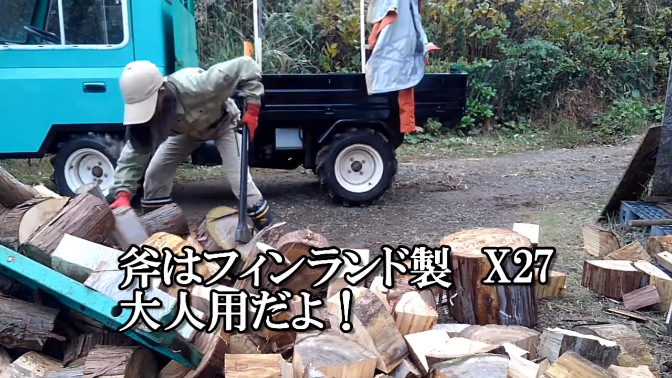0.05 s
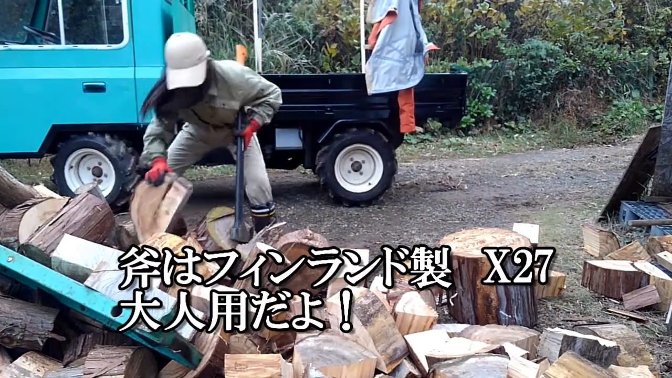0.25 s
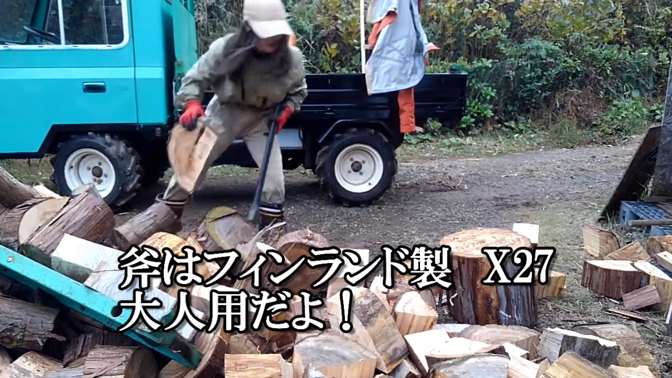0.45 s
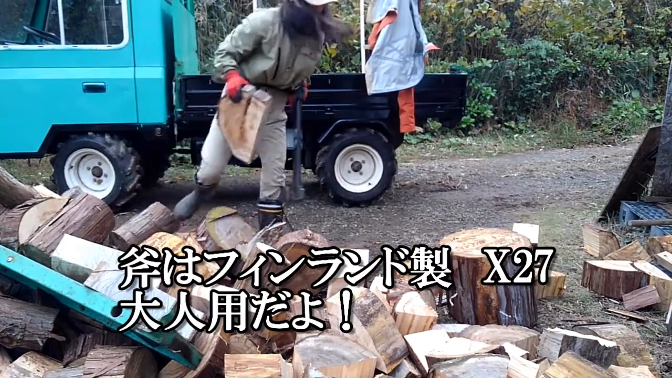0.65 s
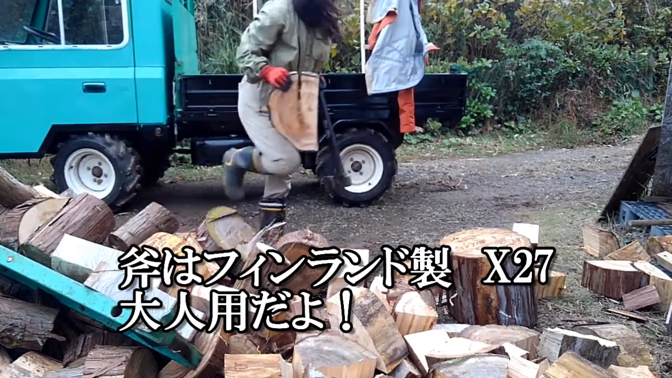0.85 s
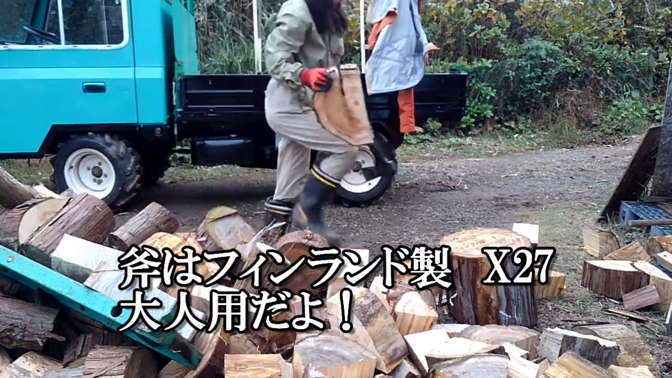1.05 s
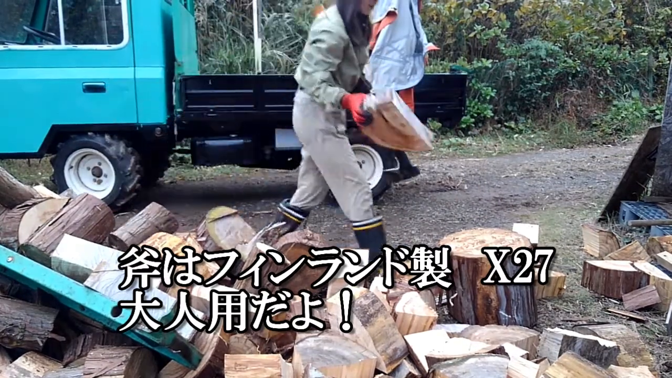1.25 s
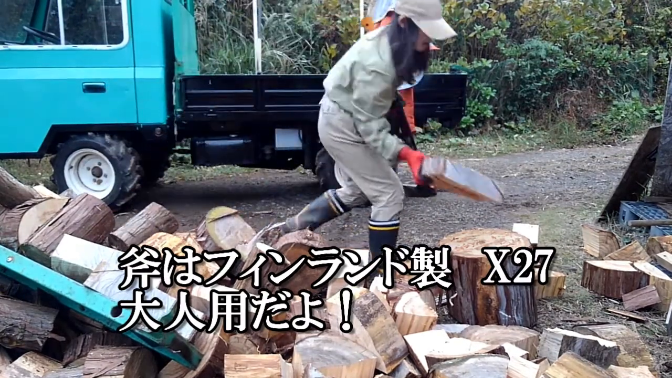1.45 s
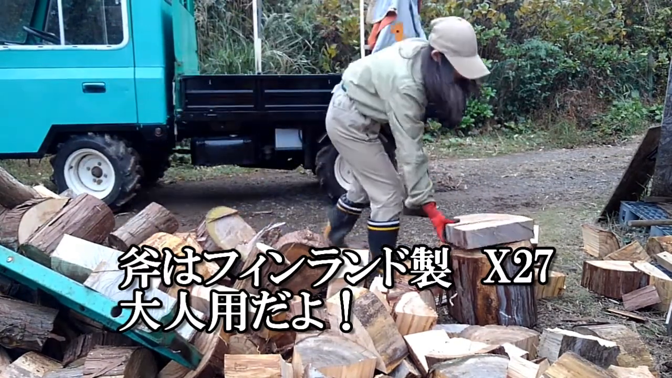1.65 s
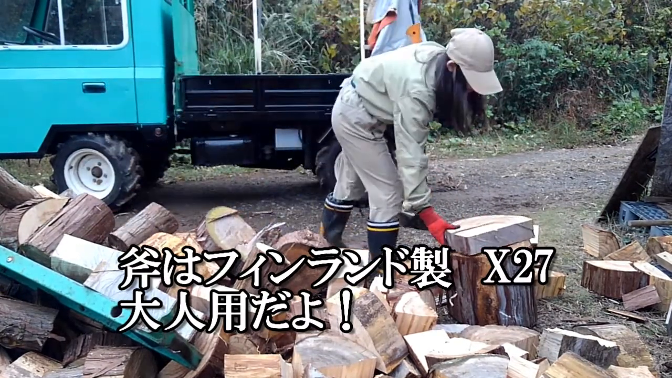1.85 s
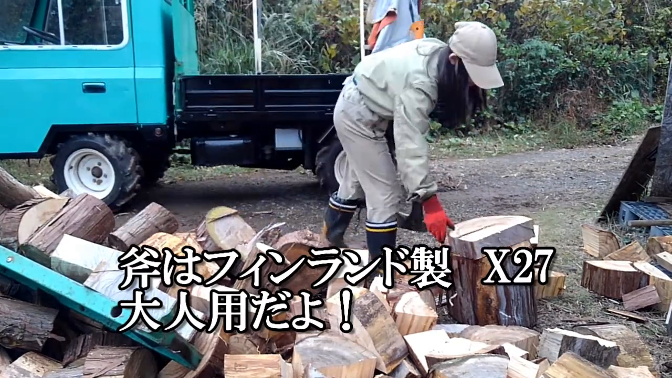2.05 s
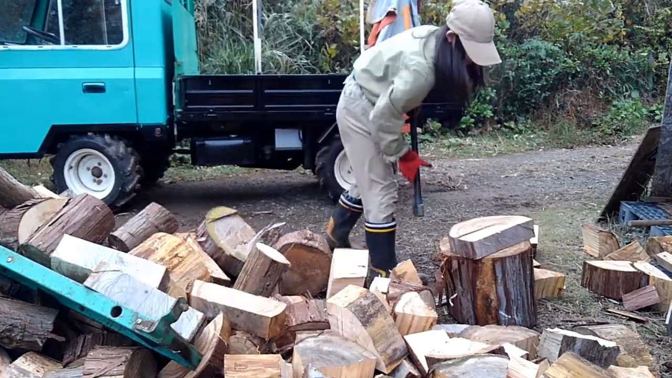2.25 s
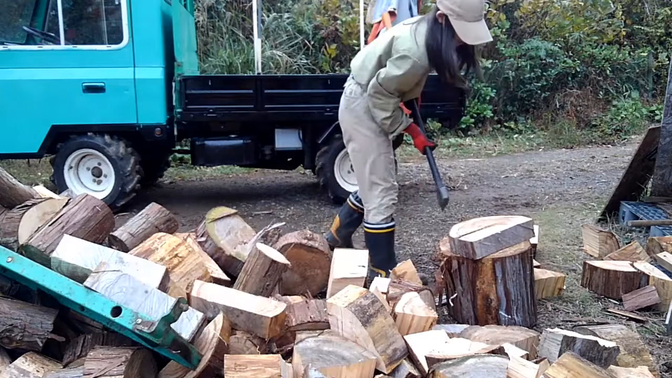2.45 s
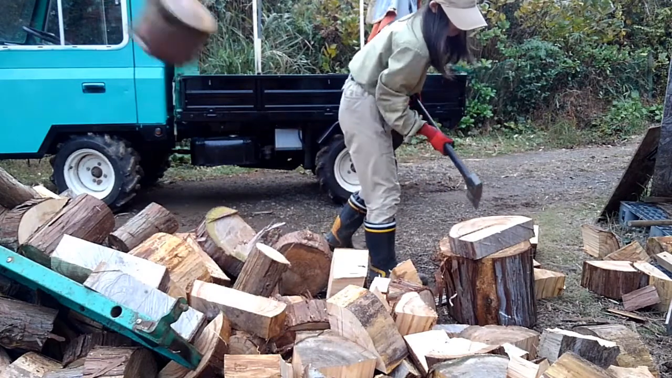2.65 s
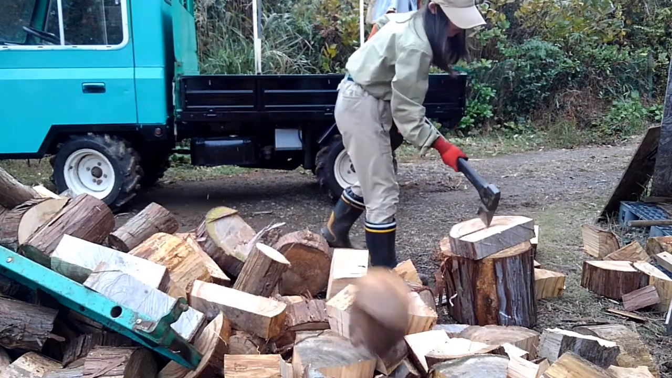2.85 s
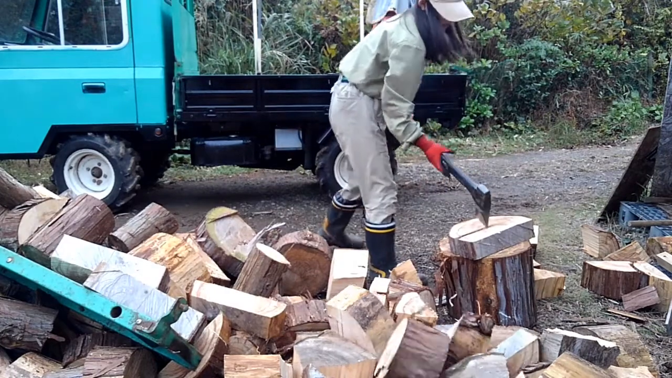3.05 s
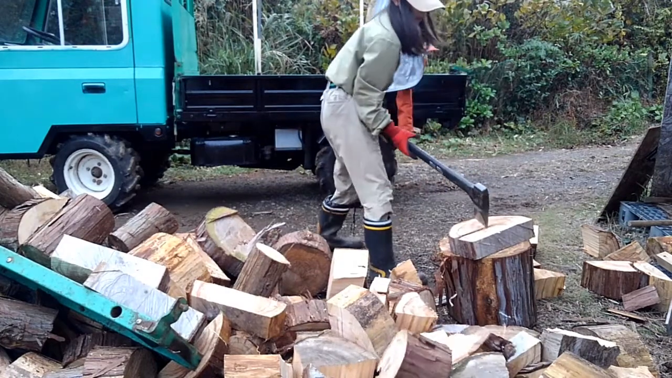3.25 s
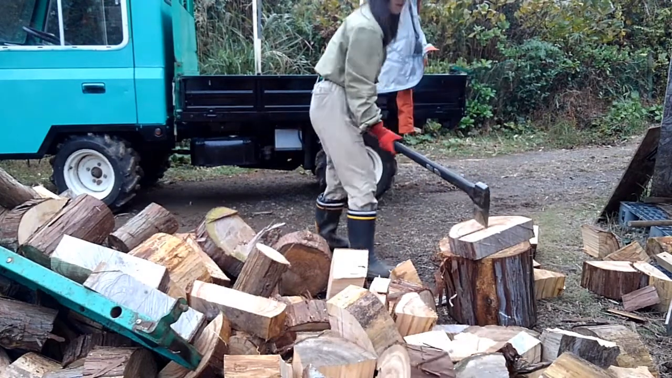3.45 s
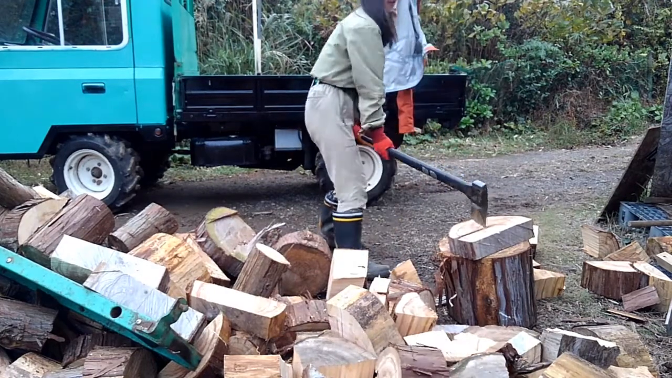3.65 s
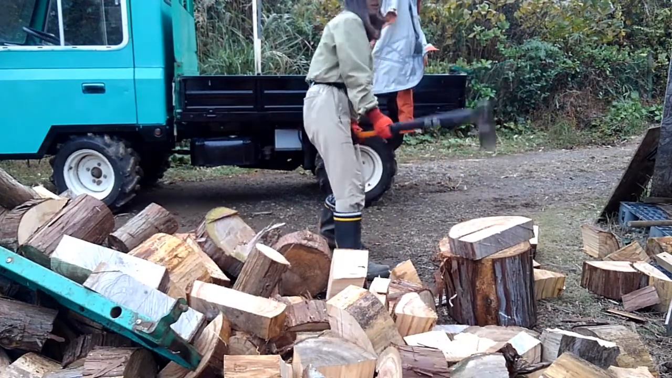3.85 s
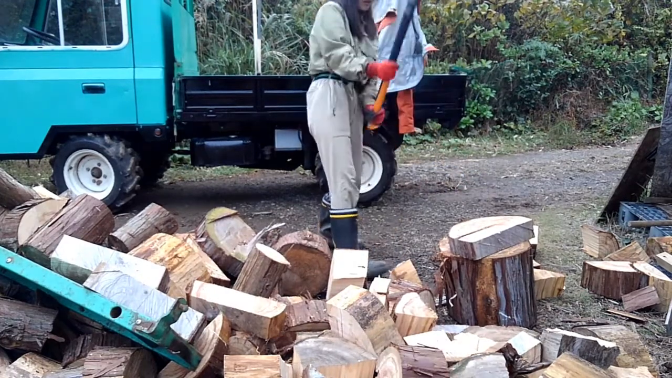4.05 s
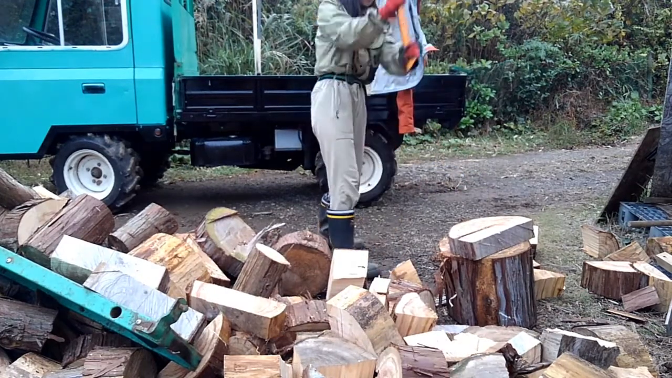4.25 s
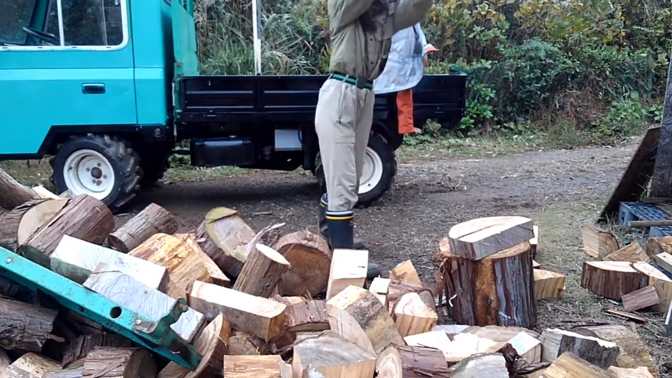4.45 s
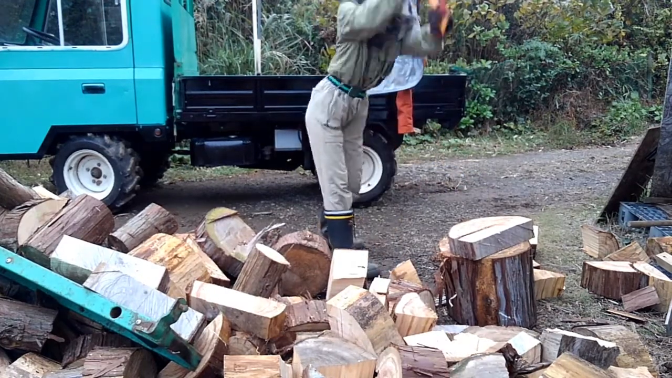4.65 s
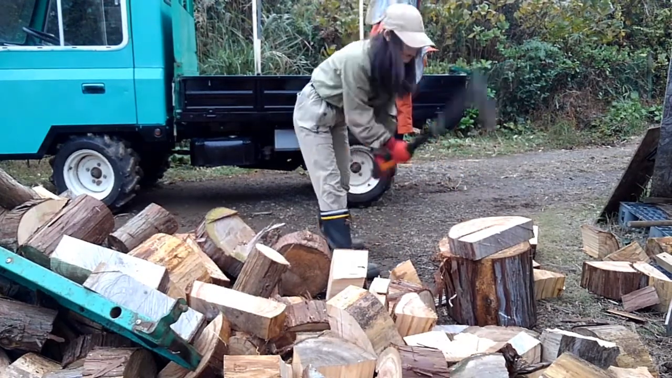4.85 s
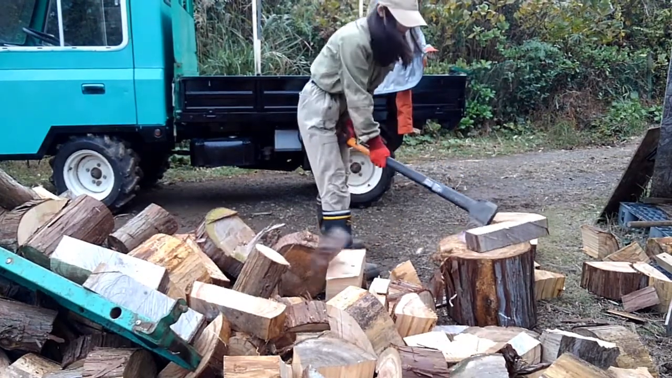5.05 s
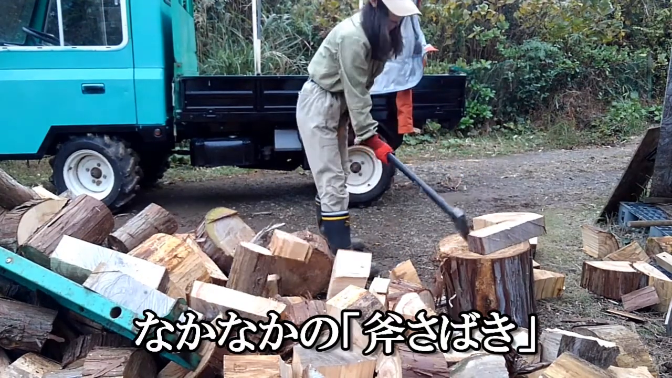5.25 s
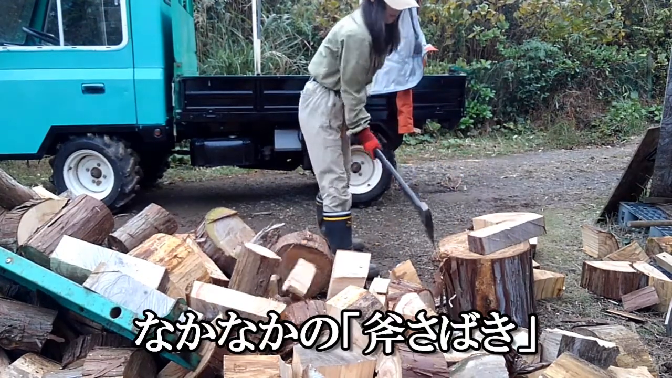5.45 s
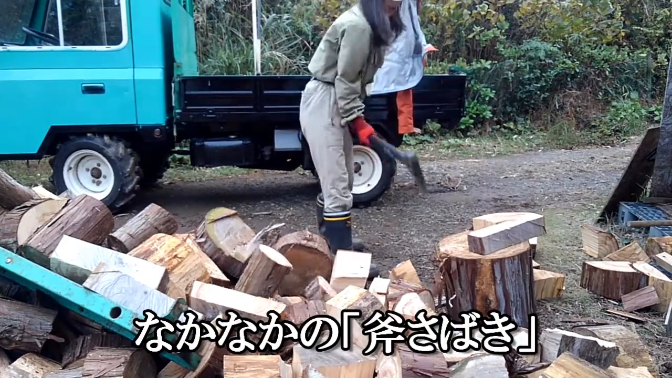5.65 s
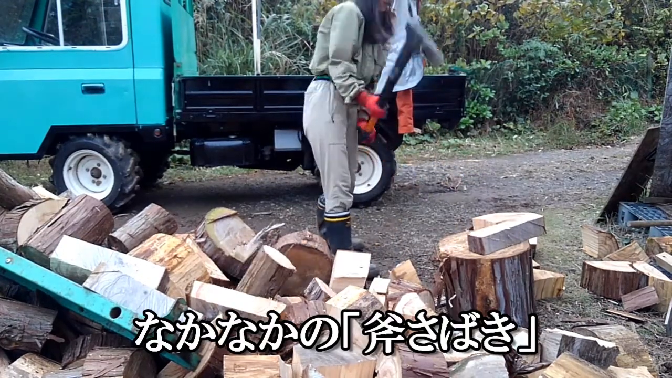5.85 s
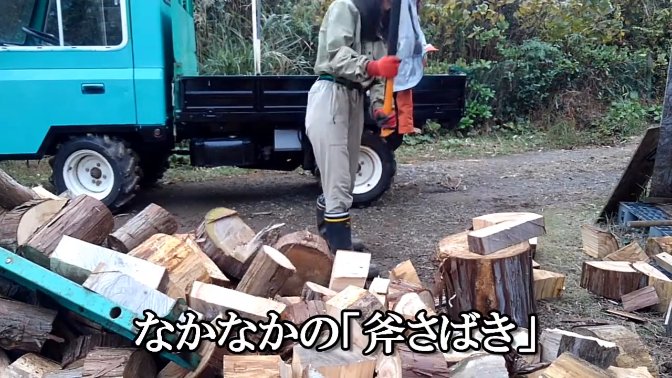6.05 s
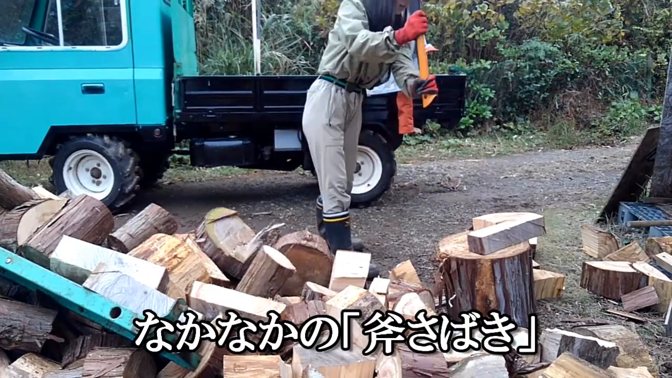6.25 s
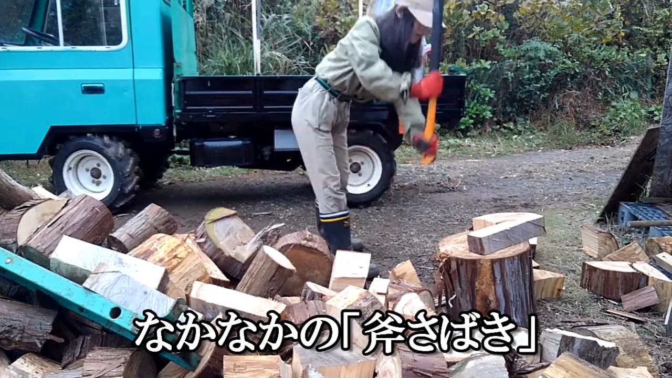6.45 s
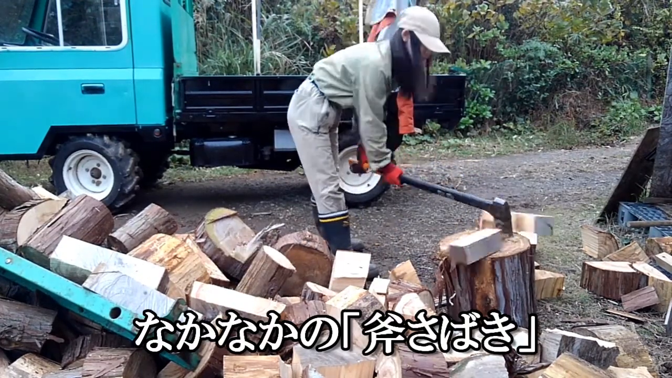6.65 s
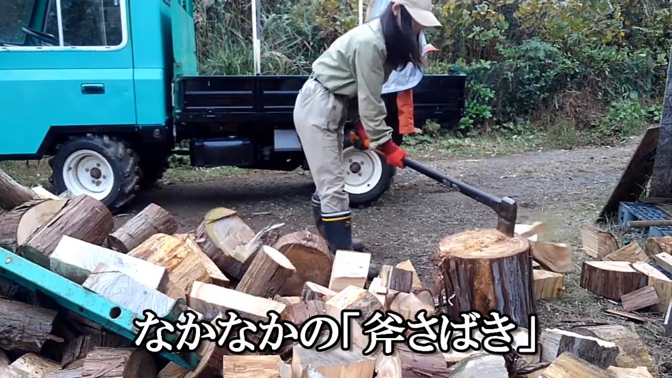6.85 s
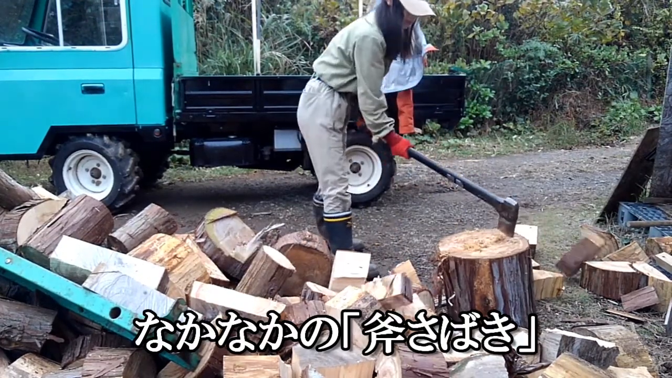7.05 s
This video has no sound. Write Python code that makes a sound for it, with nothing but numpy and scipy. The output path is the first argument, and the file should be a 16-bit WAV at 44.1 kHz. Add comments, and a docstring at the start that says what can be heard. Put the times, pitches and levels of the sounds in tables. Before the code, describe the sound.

In a quiet open yard, rubber boots crunch on gritty earth and wood pieces knock faintly. A tossed round booms onto the pile and chips trickle. After a lull, an axe cracks hard into a thick billet, and pieces tumble. A second, brighter, splintering blow follows with a low thud from the block. The microphone is a few metres away; a tiny engine revs far off.

```python
"""Two axe blows split firewood in an open yard: dying showers of fibre snaps heard through ringing wood.
Before them, boots press gritty earth, billets knock, and a tossed round lands on the pile with a boom.
Pieces tumble as decaying modes, chips rain as short tones, and boots and cloth scrape as shaped noise.
Pile, parked truck and trees answer as noise tails; behind lie air, low rumble and rustle.
A small engine revs very far away, as a few wavering harmonics."""
import sys
import numpy as np
from scipy import signal
from scipy.fft import rfft, irfft, next_fast_len
from scipy.io import wavfile
from scipy.ndimage import map_coordinates

SR = 44100
rng = np.random.default_rng(int(sys.argv[2]) if len(sys.argv) > 2 else 0)


def wav_out(sig):
    """Save sig, one row per channel (or a flat mono array), as 16-bit PCM at SR to the path in sys.argv[1]."""
    wavfile.write(sys.argv[1], SR, np.round(np.clip(np.atleast_2d(sig).T, -1, 1) * 32767).astype(np.int16))


N = 313110

# heavy blows driving the block and the ground:
# (time [s], thud drive [dB], knock drive [dB], knock pitch [Hz])
HEAVY_BLOWS = [(2.8876, -44, -8, 540), (2.9244, -32.5, -16, 332), (4.9183, -25.5, -7.5, 606),
               (6.6668, -20, -19, 904)]
# colour of grit under boots and in scrapes: (frequency [Hz], density [dB per Hz])
GRIT_COLOUR = [(80, -0.5), (500, 1.5), (5000, -8), (9000, -15), (13000, -9.5), (16000, -11.5)]


def amp(db):
    """Decibels to gain."""
    return 10 ** (np.asarray(db) / 20)


def unit(x):
    """Scale to rms 1."""
    return x / np.sqrt(np.mean(x ** 2) + 1e-20)


def along(points, hz):
    """Read (Hz, value) points at any frequency, on a log axis."""
    f, v = np.transpose(points)
    return np.interp(np.log(hz + 1), np.log(f + 1), v)


def wobble(rate):
    """A smooth random curve with the given number of knots a second."""
    knots = rng.standard_normal(int(N * rate / SR) + 4)
    return map_coordinates(knots, [np.arange(N) * rate / SR])


def swell(s, rise, fall):
    """A bell-shaped rise to 1 at time s and a fall back to 0; rise and fall are Gaussian widths [s]."""
    t = np.arange(N) / SR - s
    return np.exp(-.5 * (t / np.where(t < 0, rise, fall)) ** 2)


def filtered(x, response):
    """Multiply the spectrum of x by a response of frequency."""
    m = next_fast_len(len(x) + SR // 4)
    return irfft(rfft(x, m) * response(np.fft.rfftfreq(m, 1 / SR)), m)[:len(x)]


def noise(colour_db, size=N):
    """Coloured noise of rms 1."""
    return unit(filtered(rng.standard_normal(size), lambda hz: amp(colour_db(hz))))


def add(track, s, sound):
    """Mix a sound into the track at time s."""
    part = track[max(round(s * SR), 0):][:len(sound)]
    part += sound[:len(part)]


def body(spectrum, tilt_db=0, size=2048):
    """Minimum-phase impulse response of energy 1; the tilt is in dB per octave about 1 kHz."""
    hz = np.fft.rfftfreq(size, 1 / SR)
    octaves = np.log2(np.maximum(hz, 100) / 1000)
    level_db = np.maximum(along(spectrum, hz), -70) + tilt_db * octaves
    cepstrum = irfft(np.log(amp(level_db)))
    # folding the cepstrum onto positive time makes the response causal
    cepstrum[1:size // 2] *= 2
    cepstrum[size // 2 + 1:] = 0
    response = irfft(np.exp(rfft(cepstrum)))
    return response / np.linalg.norm(response)


def fade(t60):
    """Half a second of exponential decay, 60 dB in t60 seconds."""
    return np.exp(-np.log(1000) * np.arange(SR // 2) / SR / max(t60, .003))


def ring(modes, scatter_db=-0.1, attack=.0005):
    """Sum damped modes, struck at new strengths and phases each time."""
    t = np.arange(SR // 2) / SR
    total = np.zeros(len(t))
    for hz, db, t60 in modes:
        strength = amp(db + scatter_db * rng.normal())
        total += strength * fade(t60) * np.sin(2 * np.pi * (hz * t + rng.random()))
    return (1 - np.exp(-t / attack)) * total


def crack(response, t60, spiky_db, push_db=-6):
    """One blunt push and a dying shower of fibre snaps, heard through the wood."""
    # each random strength holds for 16 samples
    strengths = np.repeat(rng.standard_normal(SR // 2), 16)[:SR // 2]
    snaps = rng.standard_normal(SR // 2) * amp(spiky_db * strengths)
    force = snaps * fade(t60)
    force /= np.linalg.norm(force)
    push = np.hanning(32)
    add(force, 0, amp(push_db) * push / push.sum())
    sound = signal.fftconvolve(force, response)[:SR // 2]
    # same energy as the bare decay envelope
    return sound * np.linalg.norm(fade(t60)) / np.linalg.norm(sound)


def split(stages, colour, modes, ringing, spiky_db, push_db):
    """The edge bites, the grain tears in a few jerks, and the freed wood rings."""
    out, response = np.zeros(N), body(colour)
    for s, db, t60 in stages:
        add(out, s, amp(db) * crack(response, t60, spiky_db, push_db))
    ring_s, ring_db = ringing
    add(out, ring_s, amp(ring_db) * ring(modes))
    return out


def axe():
    """Two splitting blows excite each billet's modes; the freed steel head rings faintly after each."""
    # bite of the edge, then tearing: (time [s], level [dB], decay t60 [s])
    first_split = [(4.9198, -3.5, 0.042), (4.9275, -12.5, 0.088), (4.9325, -7, .06), (4.9385, -14, 0.079)]
    second_split = [(6.6662, -33, .02), (6.6688, -7.5, 0.068), (6.674, -8.5, 0.074), (6.6825, -8, 0.069),
                    (6.6895, -13.5, 0.084)]
    # colour of the crashes: (frequency [Hz], density [dB per Hz])
    thick_colour = [(60, -12.5), (130, -12.5), (240, -2.5), (430, -6), (720, 1), (1000, -1), (1550, -11),
                    (1900, -8), (3000, -13), (4700, -17), (6500, -25), (9000, -37), (13000, -22.5),
                    (16000, -41)]
    thin_colour = [(60, -13.5), (170, -2), (300, -1.5), (390, -11), (520, -1), (1000, 0), (2200, -3),
                   (2900, -3), (4800, -6.5), (6500, -12), (8800, -21), (12500, -12.5), (16000, -24.5)]
    # ringing of the wood and of the axe head: (frequency [Hz], level [dB], decay t60 [s])
    thick_modes = [(228, -4, .11), (324, -1, 0.11), (559, -9.5, .1), (644, -4.5, 0.09), (740, -6, 0.086),
                   (854, -2, 0.14), (1007, 1.5, 0.12), (1190, -8.5, 0.087), (1373, -7.5, 0.2),
                   (1660, -8, .09), (2170, -12, 0.076), (2530, -5, 0.17), (3070, -13, 0.21),
                   (3620, -15, .11), (4400, -10, .09), (5580, -13.5, .1)]
    thin_modes = [(888, -2, .09), (1035, 7, 0.082), (1192, -1.5, 0.076), (1577, -4, 0.12),
                  (1795, 2.5, 0.082), (2135, -2.5, 0.099), (2340, -10, 0.15), (2610, 6, 0.064),
                  (3050, -8, 0.1), (3250, -16, 0.09), (3600, -15, 0.096), (4090, -10, .08), (4240, -9, .09),
                  (4720, -2, 0.087), (5490, -13, .11)]
    steel_modes = [(1210, -1.5, .4), (2700, -2, .45), (2920, 0, .45), (3280, -8.5, 0.37), (4620, -5.5, .3),
                   (4818, 1.5, .33), (4800, -1, .3)]
    # the head comes free: (time [s], level [dB])
    head_free = [(4.922, -44), (6.673, -40.5)]
    # ringing: (time [s], level [dB])
    out = split(first_split, thick_colour, thick_modes, ringing=(4.9215, -18.5), spiky_db=5.0, push_db=-1.5)
    out += split(second_split, thin_colour, thin_modes, ringing=(6.6815, -18.5), spiky_db=3.5, push_db=-6.0)
    for s, db in head_free:
        add(out, s, amp(db) * ring(steel_modes))
    return out


def thuds():
    """Heavy blows drive the block and ground: a short hollow knock and a low boom."""
    # the chopping block on the ground: (frequency [Hz], level [dB], decay t60 [s])
    block_modes = [(85.6, 1, 0.27), (107, -9.5, .25), (57.84, -15, .3)]
    out = np.zeros(N)
    for s, thud_db, knock_db, hz in HEAVY_BLOWS:
        add(out, s, amp(knock_db) * ring([(hz, 3, .035)], scatter_db=.5, attack=0.0018))
        add(out, s, amp(thud_db) * ring(block_modes, scatter_db=2.0, attack=.004))
    return out


def tossed_round():
    """A heavy round lands on one edge, slams into the pile and rings in its own modes."""
    # contacts with the pile: (time [s], level [dB], decay t60 [s], tilt [dB per octave])
    landing_hits = [(2.8871, -18.5, 0.057, 2), (2.902, -28.5, 0.051, 7.5), (2.9246, -10, 0.041, -1.5),
                    (2.9274, -8.5, 0.042, 0.5), (2.9396, -16, 0.085, 0.5)]
    # colour of the crash: (frequency [Hz], density [dB per Hz])
    round_colour = [(60, -19.5), (160, -9), (290, -1), (420, -5), (600, -3), (900, 0.5), (1500, -9.5),
                    (1950, -7.5), (2600, -18.5), (4200, -23), (6500, -32.5), (9000, -43), (13000, -38.5),
                    (16000, -53)]
    # ringing of the round: (frequency [Hz], level [dB], decay t60 [s])
    round_modes = [(276, -6, 0.11), (333, -9, .1), (558, 4, 0.08), (910, 10.5, 0.039), (1380, -14, 0.13),
                   (1696, -4, 0.12), (2100, -12.5, .12), (2285, -12, 0.099), (3170, -18, .08)]
    out = np.zeros(N)
    for s, db, t60, tilt_db in landing_hits:
        add(out, s, amp(db) * crack(body(round_colour, tilt_db), t60, spiky_db=4.5, push_db=1.5))
    ring_s, ring_db = 2.9262, -19.5
    add(out, ring_s, amp(ring_db) * ring(round_modes))
    return out


def billets():
    """Each loose piece clacks, rings briefly in its bending modes and slaps down with its other end."""
    # pieces knock and settle: (time [s], level [dB], ring pitch [Hz], tilt [dB per octave])
    piece_knocks = [(.276, -51.5, 1890, 0), (.378, -45.5, 1545, -2.5), (.477, -53, 1090, 0),
                    (.564, -50, 2340, 3.5), (.645, -52.5, 1220, 1.5), (.722, -48.5, 1085, 4),
                    (.751, -50, 1070, 2), (.8, -49, 1056, 0.5), (1.6, -41, 940, -2.5),
                    (1.673, -40.5, 767, -0.5), (2.225, -51, 420, -1.5), (2.311, -46, 402, -2.5),
                    (2.998, -29.5, 341, -5), (3.002, -35, 1247, -5), (3.1173, -42, 1525, -1),
                    (3.423, -43, 670, -6), (4.778, -46, 1490, 1.5), (5.009, -36, 553, 1.5),
                    (5.0413, -27.5, 1690, 0), (5.163, -28, 510, -3), (5.435, -35.5, 475, 2),
                    (5.611, -43.5, 633, -1.5), (6.205, -53.5, 640, -4), (6.807, -32.5, 452, -2),
                    (6.9708, -37, 658, -3.5), (7.0243, -48.5, 710, -3.5), (7.088, -47.5, 442, -4.5)]
    # colour of a clack: (frequency [Hz], density [dB per Hz])
    bark_colour = [(60, -17.5), (200, -2), (500, 3.5), (1500, -3), (4500, -9.5), (9000, -26),
                   (13000, -24.5), (16000, -30)]
    clack_t60_1k, low_rings_longer = .058, .2  # decay [s] for a 1 kHz piece; power of 1 / pitch
    ring_over_clack_db = 2
    slap_delay, slap_db, slap_tilt_db = .016, -7.5, 1  # [s], [dB], extra brightness [dB per octave]
    out = np.zeros(N)
    for s, db, hz, tilt_db in piece_knocks:
        t60 = clack_t60_1k * (1000 / hz) ** low_rings_longer
        tone = ring([(hz, 0, t60 * .7), (hz * 1.31, -7, t60 * 0.5), (hz * 2.13, -8, t60 * .45)])
        clack = crack(body(bark_colour, tilt_db), t60, spiky_db=6.5)
        slap = crack(body(bark_colour, tilt_db + slap_tilt_db), t60, spiky_db=2.5)
        add(out, s, amp(db) * (clack + amp(ring_over_clack_db) * tone))
        add(out, s + slap_delay, amp(db + slap_db) * slap)
    return out


def splinters():
    """Splinters snap against the pile: thin dry ticks with hardly any ring."""
    # snaps: (time [s], level [dB])
    splinter_ticks = [(1.402, -38.5), (2.428, -51), (5.099, -49), (5.2851, -36), (5.29, -43.5),
                      (5.451, -39), (6.755, -33), (6.901, -42)]
    # colour of a tick: (frequency [Hz], density [dB per Hz])
    splinter_colour = [(300, -21.5), (1500, -4.5), (3200, -1.5), (4400, 1), (6000, -9), (8000, -27),
                       (13000, -28), (16000, -32)]
    out, response = np.zeros(N), body(splinter_colour)
    for s, db in splinter_ticks:
        add(out, s, amp(db) * crack(response, t60=0.031, spiky_db=2.5))
    return out


def debris(per_second=260, size_db=4, tilt_db=-3.0):
    """Chips and bark rain down or shift under a boot: many tiny, a few large, each with its own pitch."""
    # showers: (start time [s], reference level [dB], decay t60 [s])
    chip_showers = [(.45, -56.5, 1.25), (1.61, -36.5, 0.45), (2.945, -36, 0.26), (4.95, -33, .34),
                    (6.7, -27.5, 0.37)]
    out, t = np.zeros(N), np.arange(400) / SR
    for s, db, t60 in chip_showers:
        delay = rng.uniform(0, t60, max(int(per_second * t60), 1))
        hz = np.clip(2300 * np.exp(.6 * rng.standard_normal(len(delay))), 850, 7000)
        chip_size = np.minimum(rng.exponential(size=len(delay)), 2.5)
        gains = amp(size_db * chip_size - size_db + tilt_db * np.log2(2300 / hz) / 2)
        for late, f, gain in zip(delay, hz, gains):
            chip = np.sin(2 * np.pi * f * t) * np.exp(-f * t / 3.1)  # rings for a few cycles
            dying = np.exp(-np.log(1000) * late / t60)
            add(out, s + late, amp(db) * gain * dying * chip)
    return out


def steps():
    """Rubber boots press on packed earth and crunch its grit."""
    # soft footfalls: (time [s], level [dB])
    footfalls = [(.28, -61), (.5, -52.5), (.56, -57), (1.0, -62), (1.295, -44.5), (1.598, -45),
                 (1.98, -53.5), (3.478, -50.5), (3.52, -42.5)]
    grit_db, grit_t60 = -5.5, 0.24  # level against the step [dB], decay [s]
    earth = body([(40, -15), (100, 1.5), (170, -1.0), (400, -12.0), (1200, -38), (8000, -55)])
    grit = body(GRIT_COLOUR, tilt_db=-1.0)
    out = np.zeros(N)
    for s, db in footfalls:
        add(out, s, amp(db) * crack(earth, t60=0.16, spiky_db=3.5))
        add(out, s, amp(db + grit_db) * crack(grit, grit_t60, spiky_db=6.5, push_db=-11))
    return out


def scuffs(grain_db=3.0, focus_db=3.0):
    """Boots, chips and cloth scrape: short swells of grainy noise."""
    # scrapes: (peak time [s], level [dB], Gaussian width [s], focus frequency [Hz])
    scrapes = [(1.312, -56, 0.051, 3460), (1.401, -49.5, 0.017, 4230), (1.649, -51, 0.029, 3520),
               (1.888, -53.5, 0.034, 3500), (2.124, -53.5, 0.05, 3100), (3.541, -58.5, .025, 1490),
               (4.754, -53, 0.036, 2250), (5.24, -54.5, 0.029, 5000), (5.632, -56, .028, 4450),
               (6.916, -45.5, 0.0067, 6500)]
    out, t = np.zeros(N), np.arange(SR // 2) / SR
    middle = t.mean()
    for s, db, width, focus_hz in scrapes:
        focus = lambda hz: focus_db * np.log2((hz + 1) / focus_hz) ** 2
        hiss = noise(lambda hz: along(GRIT_COLOUR, hz) - focus(hz), size=len(t))
        grains = unit(amp(grain_db * wobble(700)[:len(t)]))
        envelope = np.exp(-.5 * ((t - middle) / width) ** 2)
        add(out, s - middle, amp(db) * hiss * grains * envelope)
    return out


def yard(x, near_db, near_t60, far_db):
    """From 12 ms on, close scatter from the pile and truck and a thin tail from the trees, as decaying noise."""
    # decay of the trees' tail: (frequency [Hz], t60 [s])
    tree_decay = [(80, 0.65), (300, 0.6), (1000, .85), (3000, 0.77), (8000, 0.47), (15000, 0.33)]
    hz, t, z = signal.stft(rng.standard_normal(SR), SR, nperseg=256)
    decay = np.exp(-np.log(1000) * t / along(tree_decay, hz)[:, None])
    far = signal.istft(z * decay, SR, nperseg=256)[1]
    near = rng.standard_normal(SR // 2) * fade(near_t60)

    def echo(tail):
        late = np.pad(tail / np.linalg.norm(tail), (round(.012 * SR), 0))
        return signal.fftconvolve(x, late)[:N]

    return amp(near_db) * echo(near) + amp(far_db) * echo(far)


def rustle():
    """Clothes, leaves and wood chips rustle as the work goes on: noise that swells and flutters."""
    # (time [s], treble level [dB])
    rustle_level = [(0.0, -64.5), (1.2, -64.5), (1.48, -59.5), (2.02, -60.5), (2.33, -69), (2.61, -69),
                    (2.95, -62), (3.08, -60), (3.52, -63), (4.13, -60.5), (4.37, -65.5), (4.98, -66),
                    (5.1, -62), (5.42, -66.5), (6.37, -73.5), (6.7, -74.5), (6.82, -57), (7.1, -64.5)]
    # (frequency [Hz], density [dB per Hz])
    leaf_colour = [(120, -36), (200, -9), (350, -2), (560, -4), (820, -8), (1200, -6), (2800, -7),
                   (5400, -8.5), (8400, -19), (10800, -19), (13000, -12), (16000, -24)]
    whole_over_treble_db, flutter_db = 2, 0.9
    s, treble_db = np.transpose(rustle_level)
    level_db = np.interp(np.arange(N) / SR, s, treble_db) + whole_over_treble_db
    return amp(level_db + flutter_db * wobble(28)) * noise(lambda hz: along(leaf_colour, hz))


def rubs():
    """Hollow rubs of wood on wood: slow swells of narrow-band noise."""
    # (peak time [s], level [dB], Gaussian width [s])
    rub_strokes = [(2.164, -60, 0.091), (3.93, -64, 0.099)]
    strokes = sum(amp(db) * swell(s, width, width) for s, db, width in rub_strokes)
    hollow = [(200, -55.0), (340, -17), (385, -2.5), (440, -3.5), (500, -14), (1000, -33)]
    return strokes * noise(lambda hz: along(hollow, hz))


def rumble():
    """Steady low rumble outdoors; the pile rumbles on after each heavy blow."""
    steady_db = -57.5
    shake_db, shake_t60 = -17, 1.2  # level against the thud drive [dB], decay [s]
    t, shake = np.arange(N) / SR, 0
    for s, thud_db, _, _ in HEAVY_BLOWS:
        dying = np.exp(-np.log(1000) * np.abs(t - s) / shake_t60)
        shake = shake + (t > s) * amp(thud_db + shake_db) * dying
    low = [(10, -8.5), (28, 2), (85, -5.5), (150, -14.0), (400, -34), (2000, -83)]
    return np.hypot(amp(steady_db), shake) * noise(lambda hz: along(low, hz))


def still_air():
    """Steady noise of the still air, strongest in the bass."""
    # (frequency [Hz], density [dB per Hz])
    air_colour = [(12, -30.5), (20, 1.5), (44, -4.5), (146, -24), (270, -24.5), (319, -26), (472, -24.5),
                  (1090, -28.5), (1260, -31), (1710, -32), (3740, -37), (9140, -54.5), (14300, -47.5),
                  (16000, -51.5)]
    return amp(-58.0) * noise(lambda hz: along(air_colour, hz))


def far_engine():
    """Pitch and level follow the throttle; only a few wavering harmonics carry over the distance."""
    # revs: (peak time [s], top base pitch [Hz], level [dB], rise width [s])
    engine_revs = [(2.62, 314, -70.5, 0.17), (3.55, 320.5, -66, .1), (4.12, 322.7, -64.5, 0.17),
                   (4.8, 330, -65.5, .12), (5.36, 299.7, -68.5, .12), (6.14, 333.5, -68, .2)]
    # harmonics that carry: (multiple of the base pitch, level [dB])
    harmonics = [(3, -5.5), (4, 0.5), (5, -3.5)]
    idle_hz, fall_over_rise = 265, .8  # base pitch between revs [Hz]; ratio of fall to rise width
    louder_with_throttle = 0.7  # power law of the level
    hz, gain = idle_hz, 0
    for s, top_hz, db, rise in engine_revs:
        throttle = swell(s, rise, rise * fall_over_rise)
        hz = hz + (top_hz - idle_hz) * throttle
        gain = gain + amp(db) * throttle ** louder_with_throttle
    phase = 2 * np.pi * np.cumsum(hz * (1 + 0.0042 * wobble(40))) / SR
    total = 0
    for multiple, db in harmonics:
        # many paths through the trees add with drifting phases, blurring each line and breaking it up
        paths = unit(wobble(25)) + 1j * unit(wobble(25))
        total = total + amp(db) * np.real(paths * np.exp(1j * round(multiple) * phase)) / 2
    return gain * total


def scene():
    """All sources in the open yard, near to far."""
    blows = axe() + thuds() + billets() + splinters() + debris() + steps() + scuffs()
    landing = tossed_round()
    echoes = yard(blows, near_db=-15.5, near_t60=.2, far_db=-29.0)
    echoes += yard(landing, near_db=-15.5, near_t60=0.18, far_db=-31.5)
    background = rustle() + rubs() + rumble() + still_air()
    return blows + landing + echoes + background + far_engine()


def record(dry):
    """The loudest peaks are rounded off near full scale, then the treble is cut steeply."""
    ceiling, top_hz = .96, 15900  # of full scale; band limit [Hz]
    squashed = dry / (1 + np.abs(dry / ceiling) ** 8) ** (1 / 8)
    return filtered(squashed, lambda hz: 1 / (1 + (hz / top_hz) ** 160))


dry = scene()
out = record(dry)
wav_out(out)
```